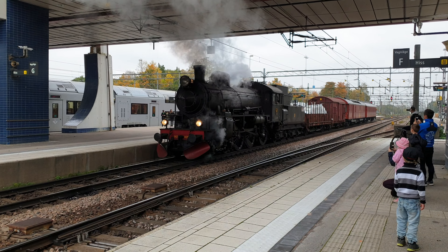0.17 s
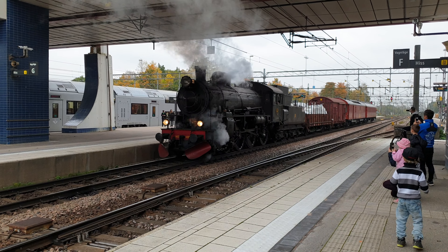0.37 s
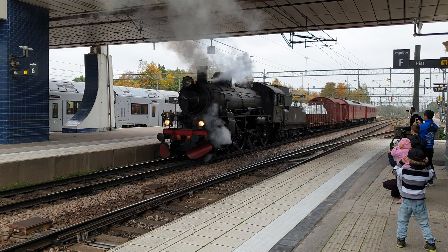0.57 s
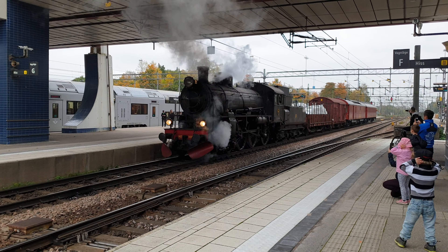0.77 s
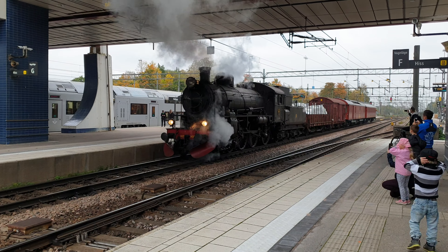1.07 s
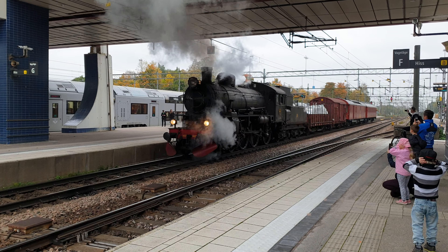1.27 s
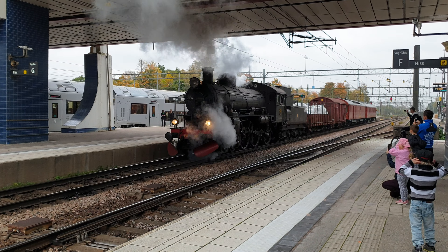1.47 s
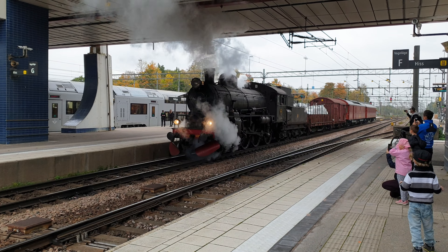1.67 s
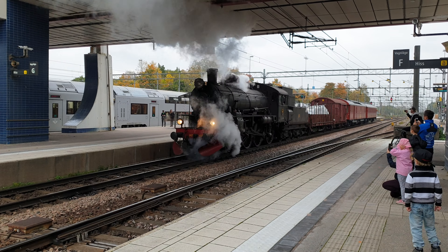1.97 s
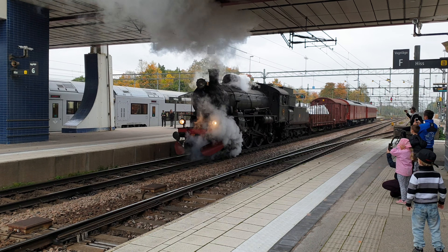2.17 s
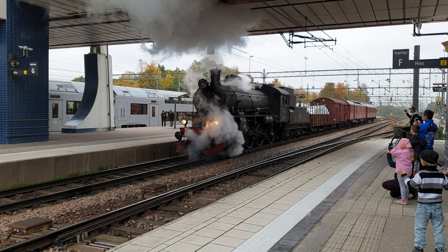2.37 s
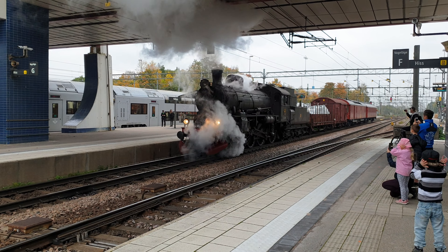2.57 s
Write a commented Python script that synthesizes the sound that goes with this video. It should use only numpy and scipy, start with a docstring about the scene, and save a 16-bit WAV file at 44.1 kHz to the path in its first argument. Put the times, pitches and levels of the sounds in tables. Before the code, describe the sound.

A steam locomotive hisses loudly at a station platform, with one low, rough exhaust chuff midway

```python
"""Under a station platform roof, a steam locomotive hisses, rumbles and gives one exhaust beat.
A bright jet from the cylinder drains dies away over a smoother valve hiss; boiler and yard rumble below.
These three are coloured noise in narrow bands. The beat is noise ringing in chimney resonances, and the
concrete roof rolls it on. Two close microphone ports share most of the bass and little of the treble."""
import sys
import numpy as np
from scipy import signal
from scipy.fft import rfft, irfft, next_fast_len
from scipy.io import wavfile
from scipy.ndimage import uniform_filter1d

SR = 44100
rng = np.random.default_rng(int(sys.argv[2]) if len(sys.argv) > 2 else 0)


def unload_audio(sound):
    """Save the sound as a 16-bit wav file, at the path given as the first command line argument."""
    columns = np.transpose(np.atleast_2d(sound))
    # keep every value between -1 and 1, then stretch to whole-number steps
    steps = np.round(np.clip(columns, -1, 1) * 32767)
    wavfile.write(sys.argv[1], SR, steps.astype(np.int16))


def to_linear_factor(level_db):
    """Convert decibel levels (scalar or array-like) to linear amplitude factors."""
    exponent = np.asarray(level_db, float) / 20
    return 10 ** exponent


N = 119511  # length [samples]
M = next_fast_len(N)  # padded length for quick transforms
T = np.arange(N) / SR  # time [s]

# In every colour table the dB are relative, per Hz of bandwidth; outside its end rows there is no sound.
# "Shared" is what both ports hear alike, "opposite" what they hear with opposite sign.
# Rumble of boiler and yard, shared part: (time [s], level [dB])
RUMBLE_LEVEL = [(0, -38), (.4, -40), (1.1, -41.5), (1.8, -43.5), (2.3, -43.5), (2.71, -43)]
# Rumble colour, shared, then opposite: (frequency [Hz], density [dB])
RUMBLE_SHARED = [(13, -42), (22, -12), (59, 3), (97, -3.5), (149, 1), (224, -5), (338, -2.5), (444, -10.5),
                 (535, -3), (728, -5.5), (779, -3), (956, -19.5), (1300, -7), (1690, -38), (2860, -120)]
RUMBLE_OPPOSITE = [(13, -48), (22, -11), (275, -6.5), (368, -7), (668, -2), (956, -9), (1060, -6),
                   (1150, -15), (1300, 0), (1690, -29), (2860, -120)]
# Valve hiss, shared part: (time [s], level [dB])
VALVE_LEVEL = [(0, -26), (.4, -27.5), (.9, -30.5), (1.3, -31.5), (1.6, -33), (1.73, -31), (1.8, -30),
               (2.2, -28.5), (2.4, -30.5), (2.6, -29), (2.66, -29), (2.71, -29)]
# Valve colour, shared, then opposite: (frequency [Hz], density [dB])
VALVE_SHARED = [(530, -51), (900, -7), (991, -20), (1060, -11.5), (1160, -14), (1210, -7), (1420, -19.5),
                (1720, -8.5), (1940, -1.5), (2410, -5), (2620, -13.5), (2850, -9.5), (3130, -8.5),
                (4130, -5), (4880, 0), (6130, -1), (6510, -7), (7420, -3), (8680, -13), (13200, 3),
                (15800, -7)]
VALVE_OPPOSITE = [(530, -47), (900, -18), (1560, -13), (1800, -5), (1960, -20), (3750, -1.5), (4280, -10),
                  (4600, -6), (6430, 0.5), (8890, -6), (12000, 3.5), (14500, -2.5), (15800, -8)]
# Drain jet, shared part: (time [s], level [dB])
JET_LEVEL = [(0, -20), (.1, -20), (.15, -20), (.2, -21.5), (.23, -18.5), (.32, -20.5), (.37, -22),
             (.6, -22.5), (.74, -23), (.8, -23), (.94, -23), (1.16, -23.5), (1.27, -25.5), (1.74, -25),
             (1.83, -28.5), (2.71, -34.5)]
# Jet colour, shared, then opposite: (frequency [Hz], density [dB])
JET_SHARED = [(530, -51), (900, -18), (1060, -25), (1370, -6), (1560, -10), (2130, -4.5), (2380, -15.5),
              (2560, -5), (3210, -5), (3500, -2), (3880, -1.5), (4100, -1.5), (4350, 0), (4620, -3),
              (4940, -8), (5200, -11), (5600, -11), (6200, -1), (7300, -2.5), (8300, -3.5), (8900, -5.5),
              (9300, -5), (9550, 3.5), (9800, -0.5), (10000, 0.5), (10400, -6), (11300, 1.5), (12000, -4.5),
              (14900, -2), (15800, -10)]
JET_OPPOSITE = [(530, -42), (900, -20.5), (1760, -9.5), (2740, -16), (3890, -2.5), (4330, 0), (4540, -7),
                (5500, -1.5), (5980, -12), (6830, 0.5), (8680, -11.5), (12900, -2), (15800, -5)]
# Exhaust beats, level before the chimney shapes it: (start [s], level [dB])
BEATS = [(1.218, -26.5)]
# Chimney resonances; a negative lag starts before the beat:
# (frequency [Hz], width [Hz], relative level [dB], lag of the swell [s], release [s])
CHIMNEY_MODES = [(62.5, 53, -4, 0.0012, .06), (103, 39, -4, -0.023, 0.035), (155.6, 19, 1.8, 0.018, .12),
                 (246, 24, -7, -0.0018, 0.035), (312, 48, -2, 0.011, 0.035), (596, 31, 1.5, -0.035, 0.048),
                 (690, 900, -13, -0.0074, 0.044), (866, 24, 0.5, 0.016, 0.025),
                 (1390, 490, -4, 0.0053, 0.045), (1954, 290, 0.5, 0.015, 0.033)]
# How much louder the left port is than the right: (frequency [Hz], difference [dB])
LEFT_OVER_RIGHT = [(60, 2), (110, 0.5), (200, 1), (380, 3.5), (700, 1), (1290, 1.5), (2380, 1.5),
                   (4400, 0.5), (8120, 4), (15000, 2.0)]


def table(rows, at, log=False):
    """Join the rows with straight lines, on a log scale of the first column if asked."""
    a, b = np.array(rows, float).T
    if log:
        return np.interp(np.log(at + 1), np.log(a + 1), b)
    return np.interp(at, a, b)


def unit(x):
    """Scale to rms 1."""
    return x / np.sqrt(np.mean(x ** 2))


def walk(rate):
    """Random wandering: values held for 1 / rate seconds, smoothed twice; spread near 1."""
    hold = int(SR / rate)
    steps = np.repeat(rng.standard_normal(N // hold + 1), hold)
    smooth = uniform_filter1d(uniform_filter1d(steps, hold), hold)
    return 1.58 * smooth[:N]


def echoes(hz):
    """Frequency response of a first arrival and reflections off rails, platform and engine, rms 1."""
    count, span_s, strength = 36, .022, .17
    late = rng.uniform(.35, 1, count) ** 2  # delay as a share of the span
    size = rng.standard_normal(count) * strength * (1 - .5 * late)  # later ones are weaker
    train = np.zeros(M)
    np.add.at(train, np.round(late * span_s * SR).astype(int), size)
    train[0] = 1
    return rfft(train) / np.sqrt(train @ train)


def hiss(level, shared, opposite, opposite_db, near, gust_db, flicker_db, gust_rate, flicker_rate):
    """Coloured noise, part by near paths and part diffuse; bands gust together and flicker alone.

    near is the share of power by near paths; the rates are in new values per second."""
    hz = np.fft.rfftfreq(M, 1 / SR)
    inside = (hz > shared[0][0]) & (hz < shared[-1][0])
    colour = np.array([unit(to_linear_factor(table(c, hz, True)) * inside) for c in (shared, opposite)])
    colour = colour * to_linear_factor(np.array([[0], [opposite_db]]))

    noise = rfft(rng.standard_normal((3, M)))
    near = np.clip(near, 0, 1)
    # the 1j turns the opposite part a quarter cycle
    paths = np.array([echoes(hz), 1j * echoes(hz)])
    direct = np.sqrt(near) * noise[0] * paths
    diffuse = np.sqrt(1 - near) * noise[1:]
    spectrum = (direct + diffuse) * colour

    out = 0
    place = 4 * np.log2(hz + 1)  # four overlapping bands an octave
    for band in range(int(place[inside][0]), int(place[inside][-1]) + 2):
        weight = np.sqrt(np.clip(1 - abs(place - band), 0, 1))
        part = irfft(spectrum * weight, M)[:, :N]
        out = out + part * to_linear_factor(flicker_db * walk(flicker_rate))
    out = out / np.sqrt(np.mean(out[0] ** 2))
    out = out * to_linear_factor(table(level, T) + gust_db * walk(gust_rate))
    return np.array([out[0] + out[1], out[0] - out[1]])


def rumble():
    """Boiler and yard: low noise that gusts and flickers slowly, nearly alike in both ports."""
    return hiss(RUMBLE_LEVEL, RUMBLE_SHARED, RUMBLE_OPPOSITE, opposite_db=-9, near=0.46,
                gust_db=1.2, flicker_db=0.29, gust_rate=20, flicker_rate=11)


def valve_hiss():
    """Steam hissing at a valve: broad noise that flickers less than the jet."""
    return hiss(VALVE_LEVEL, VALVE_SHARED, VALVE_OPPOSITE, opposite_db=-0.9, near=0.68,
                gust_db=0.3, flicker_db=0.64, gust_rate=40, flicker_rate=22)


def drain_jet():
    """Spluttering jet of steam, heard directly and again, faint and inverted, off the platform edge."""
    bounce_s, bounce_gain = .00166, -0.11
    jet = hiss(JET_LEVEL, JET_SHARED, JET_OPPOSITE, opposite_db=0.6, near=0.78,
               gust_db=0.48, flicker_db=1.52, gust_rate=40, flicker_rate=22)
    return jet + bounce_gain * np.roll(jet, round(bounce_s * SR), axis=1)


def chimney_beats():
    """Rough steam noise swells through each chimney resonance, holds and lets go."""
    rise_s, hold_s = .13, .07
    rough_db, rough_per_s = 1.5, 70
    out = np.zeros((2, N))
    for start, db in BEATS:
        rough = to_linear_factor(db + rough_db * walk(rough_per_s))
        for hz, width, mode_db, lag, release in CHIMNEY_MODES:
            t = T - start - lag
            swell = np.clip(t / rise_s, 0, 1) ** 2
            fade = np.exp(-np.clip(t - rise_s - hold_s, 0, None) / release)
            b, a = signal.iirpeak(hz, hz / width, SR)
            shared, opposite = (unit(signal.lfilter(b, a, v)) for v in rng.standard_normal((2, N)))
            # the higher the resonance, the less alike the two ports hear it
            spread = min(0.067 + hz / 3500, 1)
            ports = shared + spread * opposite * np.array([[1], [-1]])
            out += to_linear_factor(mode_db - 5) * swell * fade * rough * ports
    return out


def roof_echo(beats):
    """The concrete roof returns the lows of the beats as a fading, noise-like tail."""
    t60_s, gap_s, top_hz, level_db = 0.55, .03, 515, -14.5  # t60: time to fade by 60 dB
    t = np.arange(SR) / SR
    fade = 1000. ** (-t / t60_s) * (t > gap_s)
    shared, opposite = rng.standard_normal((2, SR)) * fade
    tail = np.array([shared + 0.12 * opposite, shared - 0.093 * opposite])
    tail = signal.lfilter(*signal.butter(2, top_hz, fs=SR), tail)
    tail = unit(tail) * tail.shape[1] ** -.5  # total energy near 1 per port
    lows = signal.lfilter(*signal.butter(1, top_hz, fs=SR), beats.mean(0))
    return to_linear_factor(level_db) * signal.fftconvolve(lows[None], tail, axes=1)[:, :N]


def exhaust():
    """Exhaust steam roaring through the chimney, with its return from the roof."""
    beats = chimney_beats()
    return beats + roof_echo(beats)


def scene():
    """Rumble, valve, jet and exhaust together."""
    return rumble() + valve_hiss() + drain_jet() + exhaust()


def roll_off(x):
    """The treble ends steeply here."""
    return signal.sosfilt(signal.butter(12, 16900, fs=SR, output="sos"), x)


def record(dry):
    """The left port is a little more sensitive; both lose the deepest bass. A lowpass cuts the very top."""
    bass_cut_hz, lowpass_hz = 41.6, 15730
    dry = signal.lfilter(*signal.butter(2, bass_cut_hz, "high", fs=SR), dry)
    hz = np.fft.rfftfreq(M, 1 / SR)
    half = table(LEFT_OVER_RIGHT, hz, True) / 2  # left up by half, right down by half
    ports = to_linear_factor(np.array([half, -half]))
    lowpass = hz < lowpass_hz
    heard = irfft(rfft(dry, M) * ports * lowpass, M)[:, :N]
    return roll_off(heard)


dry = scene()
out = record(dry)
unload_audio(out)
```